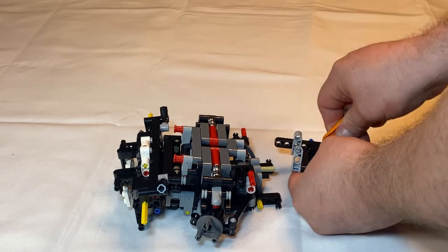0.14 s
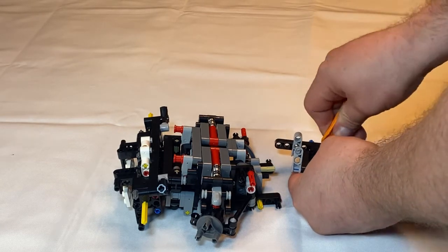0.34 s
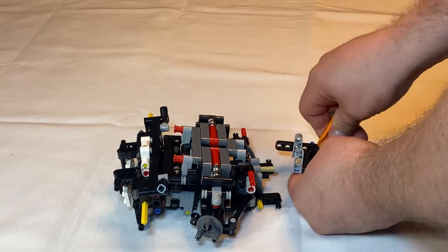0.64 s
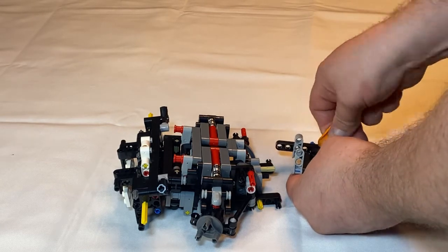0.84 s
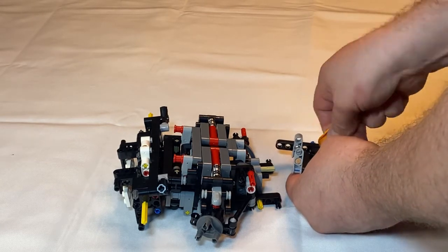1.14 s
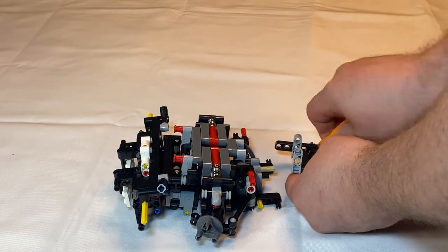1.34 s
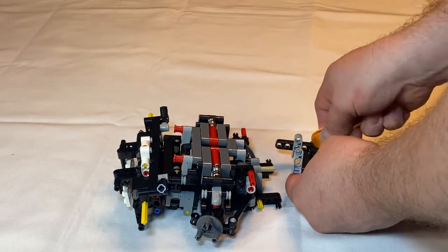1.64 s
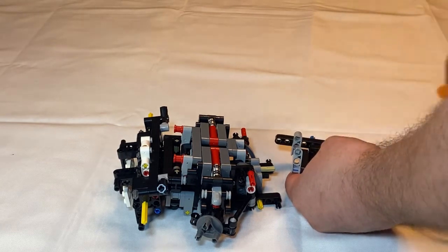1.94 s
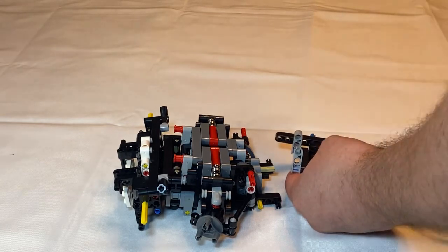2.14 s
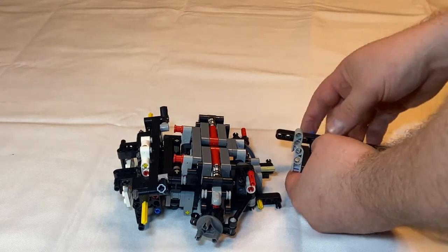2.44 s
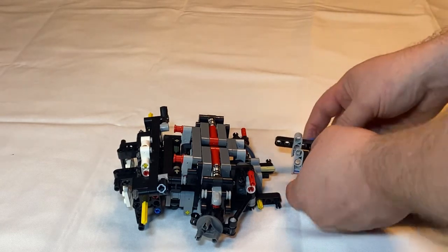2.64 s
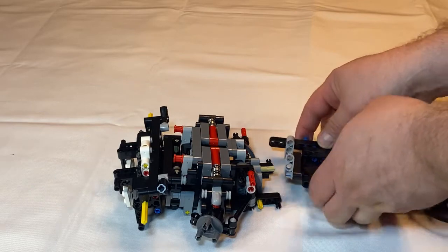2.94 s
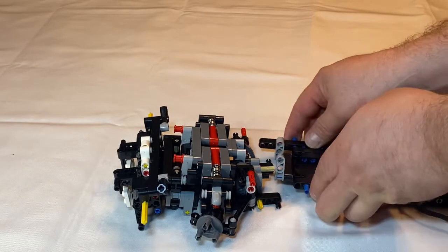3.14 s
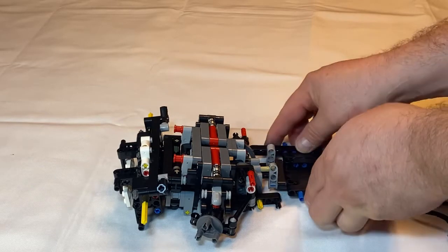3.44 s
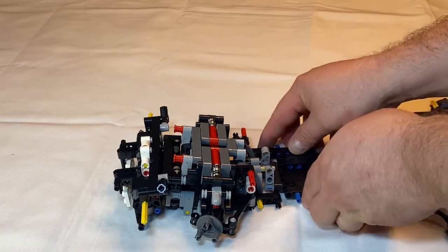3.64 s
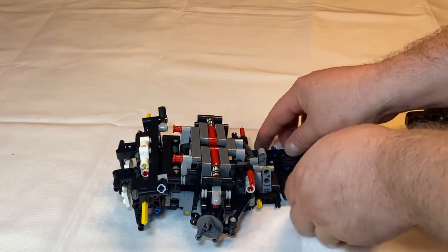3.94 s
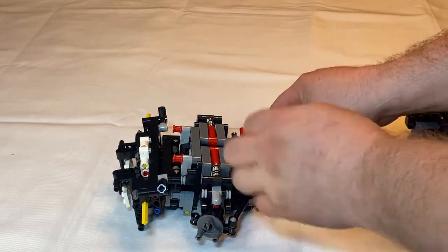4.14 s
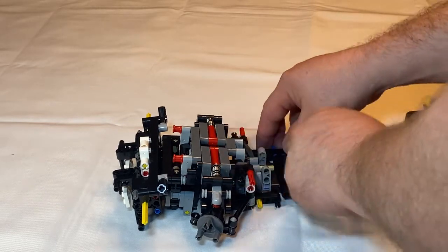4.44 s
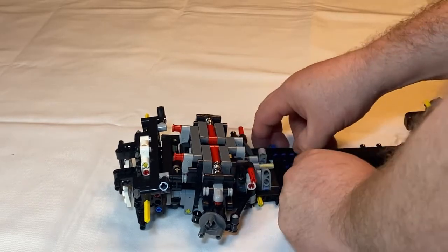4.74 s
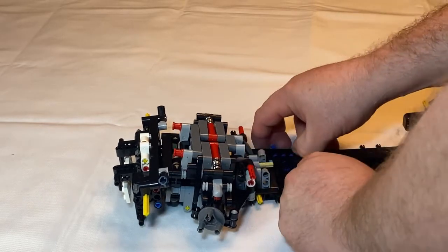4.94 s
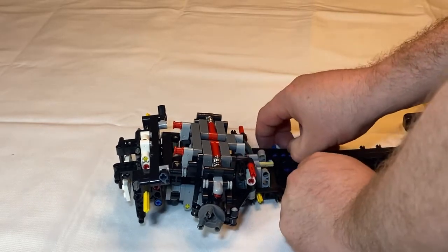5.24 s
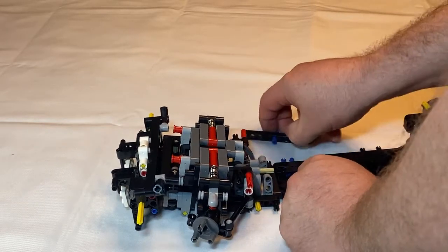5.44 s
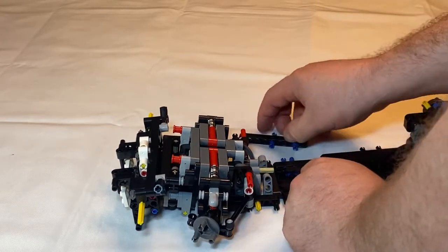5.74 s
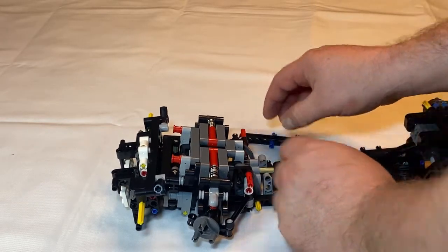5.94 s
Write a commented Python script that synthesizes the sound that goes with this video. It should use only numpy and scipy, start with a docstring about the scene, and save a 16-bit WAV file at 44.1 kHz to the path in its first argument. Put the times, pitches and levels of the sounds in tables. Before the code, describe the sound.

Plastic building bricks click and creak lightly as they are handled, with one dull knock and a loud double snap near the end.

```python
"""Assembling a plastic brick model

Hands work on a cloth-covered table in a small room. Pins click and creak in their holes by
stick-slip friction, a loose part is put down with a dull knock, and a sub-assembly slides over the
cloth. At last it snaps home: a loud double crack excites the normal modes of frame and table."""
import sys
import numpy as np
from scipy import signal
from scipy.fft import rfft, irfft
from scipy.io import wavfile

SR = 44100
rng = np.random.default_rng(int(sys.argv[2]) if len(sys.argv) > 2 else 0)


def transcribe(signal):
    """Save signal, clipped to [-1, 1], as a 16-bit WAV file at the path in sys.argv[1]."""
    frames = np.atleast_2d(signal).T
    limited = np.clip(frames, -1, 1)
    pcm = np.round(limited * 32767).astype(np.int16)
    wavfile.write(sys.argv[1], SR, pcm)


N = 268569
TAPS = 4096  # samples in a short impulse response
HZ, AGE = np.fft.rfftfreq(TAPS, 1 / SR), np.arange(TAPS) / SR  # its axes: f/Hz, t/s

# the two pins that snap home: t/s, level/dB, pin pitch f/Hz, boost at that pitch/dB
SNAPS = [(5.3471, 10, 6540, 5.5), (5.3698, 12, 2940, 9.5)]
# spectrum of the struck frame: f/Hz, level/dB
FRAME_SPECTRUM = [(60, -10.5), (180, 4), (300, 1), (480, -6), (900, -2.5), (1400, -1.5), (2100, -5),
                  (2900, -3), (4200, 2), (5300, -1), (6700, 1.5), (7800, -9), (13300, -8), (15500, -20)]
def snaps():
    """Impulsive excitation: two pins jump into their seats, each with a short burst of chatter."""
    out = np.zeros(N)
    for s, db, pin_hz, pin_db in SNAPS:
        tone_db = read(FRAME_SPECTRUM, HZ) + pin_db * bell(pin_hz, octaves=0.16)
        add(out, s, amp(db) * strike(tone_db, chatter_s=0.0018, rise_s=0.00045, evenness=0.45))
    return out


# normal modes of the whole frame: f/Hz, level/dB, T60/s
FRAME_MODES = [(867, -4, .15), (1153, -6, .15), (1330, -4, .15), (1797, -3, .16), (2623, -2, .16),
               (2660, -1, .16), (2789, 1, .16), (2840, -2, .16), (2922, -2, .16), (3567, 2, .17),
               (3980, 0, .16), (4379, 1, .18), (4999, -2, .16), (5320, -2, .16), (6635, -1, .14)]
def frame_ring(ring_db=-11):
    """Free vibration: the frame rings on after the jolt of each snap."""
    out = np.zeros(N)
    for s, db, _, _ in SNAPS:
        add(out, s, amp(db + ring_db) * ring(FRAME_MODES, detune=0))
    return out


# single clicks of pins and beams: t/s, level/dB, body/dB, treble/dB, beam pitch f/Hz
# (body and treble are relative to the middle band)
CLICKS = [(0.0144, -25.5, -10.5, -8, 2630), (0.0465, -26, -6, 1, 2600), (0.0688, -22, -10.5, -5.5, 3430),
          (0.2663, -26.5, -3, -6.5, 2970), (0.479, -34, -3, 23, 3250), (0.493, -32.5, -44, -12, 3200),
          (0.6056, -21, -15, -3, 2050), (0.8431, -30, 9, -0.5, 2560), (0.8868, -24.5, -16.5, -2, 2550),
          (1.0328, -20, -15.5, -17, 1720), (1.0473, -42, -4, 9, 2240), (1.1576, -26.5, -12, -4, 2760),
          (1.1703, -32.5, 11, 5, 2780), (2.6273, -30, -12, -4, 2690), (2.69, -29, -28, 3.5, 2740),
          (2.8676, -24.5, -5, -12, 2600), (2.9086, -23.5, -14, -13, 2730), (2.9191, -27.5, -30, -2, 2800),
          (2.9412, -24, -41, -5.5, 2650), (3.1227, -32, -34, -10, 2700), (3.7732, -28.5, -11, -3.5, 2900),
          (3.8515, -25.5, -28, -37, 2640), (3.8636, -28.5, -5.5, 5, 2960), (3.9345, -38, -16, -37, 2950),
          (4.0956, -27.5, 0.5, -11, 2520), (4.281, -36.5, -11, -10, 3100), (4.5477, -28, -8.5, -9, 2650),
          (4.817, -14.5, -11, -5, 2790), (4.9646, -25.5, 4, -0.5, 2800), (4.991, -25, -1, -6.5, 2760),
          (5.022, -26, 5.5, -7.5, 2800), (5.1383, -24.5, 3.5, -8, 2540), (5.1906, -23, 3.5, -5, 2850),
          (5.215, -29, -3.5, -7, 2830), (5.2372, -22.5, 1, -6.5, 2900), (5.2663, -21, 0.5, -1, 3240),
          (5.7976, -34, -26, -50, 2740), (5.8574, -35.5, -21, -5.5, 2996)]
# creaks of tight pins: start t/s, duration/s, number of slips, first level/dB,
# change by the last slip/dB, body/dB, treble/dB, beam pitch f/Hz
CREAKS = [(0.1953, .027, 4, -27, 0, -2.5, -5, 3520), (0.5152, 0.056, 4, -29.5, -12.5, -46, -9, 3410),
          (0.607, 0.0083, 2, -25, -1.5, 3.5, 2, 2020), (1.053, .0594, 5, -27.5, -2, -13.5, -3.5, 2590),
          (1.1245, .013, 3, -23.5, -18, -13, -1.5, 2870), (1.4604, .0385, 4, -29.5, 1.5, -20.5, -6, 2630),
          (1.6032, 0.012, 3, -38.5, 8, -1.5, 0.5, 2960), (4.5875, 0.0032, 2, -21, -8, -15, -34, 2590),
          (4.6327, 0.0081, 2, -23, 0, -5.5, -3.5, 3380)]
def slips(spread_db=3.5, jitter_s=.0004):
    """Stick-slip motion: a creak is a nearly periodic run of slips. Lists these and the single clicks."""
    contacts = list(CLICKS)
    for start, length, count, db, change_db, *colour in CREAKS:
        for along in np.linspace(0, 1, round(count)):
            late, strong = rng.standard_normal(2)
            s = start + along * length + jitter_s * late
            contacts.append((s, db + along * change_db + spread_db * strong, *colour))
    return contacts


# spectrum of a small struck part: f/Hz, level/dB
PART_SPECTRUM = [(100, -7), (400, -14.5), (1000, -18), (1800, -16.5), (2300, -3), (2800, -2), (3400, -3),
                 (4300, -10.5), (5300, -12), (6600, -9.5), (8000, -18), (10500, -24.5), (13000, -19),
                 (15500, -36.5)]
# quickly damped modes of the beams: f/Hz, level/dB, T60/s
BEAM_MODES = [(2706, -1, 0.097), (2756, 14, .04), (3210, -9.5, 0.033), (4380, -8.5, 0.016), (6000, -6, .02),
              (6900, -4, 0.02)]
def clicks(contacts, level_db=1, ring_db=-11, usual_body_db=-16, usual_treble_db=-5, sliding_db=-62):
    """Impact and resonance: each slip of a pin gives a broadband click and rings a beam."""
    out = np.zeros(N)
    low = read([(1600, 0.97), (2300, 0.12)], HZ)
    high = read([(3700, 0.083), (5200, 0.91)], HZ)
    motion, _ = friction_envelopes(contacts)
    for s, db, body_db, treble_db, beam_hz in contacts:
        colour_db = low * (body_db - usual_body_db) + high * (treble_db - usual_treble_db)
        tone_db = read(PART_SPECTRUM, HZ) + colour_db + 3 * bell(beam_hz, octaves=0.078)
        sliding = min(motion[round(s * SR)] / amp(sliding_db), 1)  # a moving contact chatters longer
        click = strike(tone_db, chatter_s=.0012 + 0.0015 * sliding, rise_s=0.00033, evenness=.2)
        beam = np.array(BEAM_MODES) * [beam_hz / BEAM_MODES[0][0], 1, 1]
        add(out, s, amp(db + level_db) * click)
        add(out, s, amp(db + ring_db) * ring(beam, detune=0.037))
    return out


# a soft brush on the table, then dull knocks of a part being put down:
# t/s, level/dB, cut-off f/Hz, chatter decay/s, rise/s
KNOCKS = [(2.11, -24, 400, 0.064, 0.049), (2.213, -18, 450, 0.012, 0.0041),
          (2.2288, -6, 2870, 0.0066, 0.001), (2.239, -8, 870, 0.011, 0.0013),
          (2.277, -17, 2520, 0.0045, 0.0029), (2.302, -16, 1510, 0.013, 0.005),
          (2.342, -26, 2030, 0.0096, 0.0055)]
# their spectrum before that cut-off: f/Hz, level/dB
KNOCK_SPECTRUM = [(60, -9.5), (170, -2), (300, 0.5), (520, -3), (700, -1), (950, -3.5), (1200, -10),
                  (1500, -7.5), (2100, -11), (2800, -10.5), (3200, -19), (3600, -31), (6000, -35),
                  (9000, -46)]
def knocks():
    """A soft contact is a low-pass filter: cloth muffles a brush, then a part that lands and settles."""
    out = np.zeros(N)
    for s, db, cutoff_hz, chatter_s, rise_s in KNOCKS:
        tone_db = read(KNOCK_SPECTRUM, HZ) - 10 * np.log10(1 + (HZ / cutoff_hz) ** 2)
        add(out, s, amp(db) * strike(tone_db, chatter_s, rise_s))
    return out


# pushes of the model against the table: t/s, level/dB, favoured f/Hz
PUSHES = [(.21, -45, 106), (0.612, -33, 132), (0.847, -44.5, 101.6), (1.106, -46.5, 148), (1.176, -51, 151),
          (1.614, -44.5, 299), (1.643, -49.5, 80), (2.878, -40, 185), (2.945, -39.5, 70), (3.87, -46.5, 76),
          (4.641, -44.5, 251.6), (4.68, -48, 90), (4.823, -43.5, 263.2), (4.839, -38.5, 90.7),
          (5.201, -45.5, 245.5), (5.349, -20, 283.3), (5.371, -27.5, 90.2)]
# normal modes of the table: f/Hz, level/dB, T60/s
TABLE_MODES = [(46, -4, .3), (75, -3.5, 0.47), (98.5, 3.5, 0.15), (139, -2.5, 0.14), (162.2, -1, 0.23),
               (193, -5, 0.21), (217.3, 0.5, 0.029), (296.4, 1.5, 0.14), (345, -4, 0.28), (398, -1.5, 0.11)]
def table_bumps(contacts, rise_s=0.0037, detune=0.027, octaves=0.77, jolt_db=-27, jolt_hz=200):
    """Modal excitation: pushes and slips ring the table; the softer the contact, the lower the modes."""
    out, t = np.zeros(N), np.arange(SR // 3) / SR
    hz, db, t60 = np.transpose(TABLE_MODES)[:, :, None]
    decay = amp(-60 * t / t60)
    jolts = [(s, slip_db + jolt_db + .5 * body_db, jolt_hz) for s, slip_db, body_db, _, _ in contacts]
    for s, push_db, contact_hz in PUSHES + jolts:
        weights = unit(amp(db) * np.exp(-.5 * (np.log2(hz / contact_hz) / octaves) ** 2))
        cycles = hz * t * (1 + detune * rng.standard_normal(hz.shape)) + rng.random(hz.shape)
        modes = (weights * decay * np.sin(2 * np.pi * cycles)).sum(0)
        add(out, s, amp(push_db) * modes * (1 - np.exp(-t / rise_s)))
    return out


# light strokes of plastic on plastic and cloth: middle t/s, duration/s, level/dB, brightness/dB
STROKES = [(0.438, 0.016, -77, 15.5), (1.474, 0.045, -56, -3), (1.745, 0.024, -63.5, -4),
           (1.93, 0.029, -95, 27.5), (2.68, 0.14, -63.5, 1), (2.898, 0.19, -51.5, -6.5),
           (3.139, 0.2, -62.5, -1.5), (3.424, 0.038, -61, 3.5), (3.543, 0.15, -69.5, -13),
           (3.716, 0.13, -64, -27), (3.81, 0.14, -62, -14)]
def friction_envelopes(contacts, edge_db=-10, scrape_db=-42.5, scrape_fade_s=.02):
    """Friction noise follows motion: low and high band gains for strokes and a scrape after each slip."""
    t = np.arange(N) / SR
    gain, treble = np.zeros((2, N))
    for s, length, db, bright_db in STROKES:
        swell = amp(db + edge_db * np.minimum((2 * (t - s) / length) ** 2, 20))
        gain += swell
        treble += swell * amp(bright_db)
    for s, db, _, treble_db, _ in contacts:
        scrape = amp(db + scrape_db) * np.exp(-AGE / scrape_fade_s)
        add(gain, s, scrape)
        add(treble, s, scrape * amp(.5 * treble_db))
    return gain, treble


# spectrum of light rubbing: f/Hz, level/dB
RUB_SPECTRUM = [(400, -27), (1000, -17.5), (1800, -5.5), (2400, -5.5), (2900, 0.5), (3800, -10), (5600, -4),
                (7100, -7), (8300, -14.5), (10100, -17), (12000, -7), (14000, -19), (15500, -28.5)]
def rubbing(contacts, level_db=-3, rattle_db=-3, split_hz=4200):
    """Sliding friction: dense tiny slips make a gritty hiss, and sparser catches rattle the beams."""
    gain, treble = friction_envelopes(contacts)
    grit = tinted(grains(per_s=530, spread_db=2.0, hiss=0.59), RUB_SPECTRUM)
    rattle = np.zeros(N)
    for _ in range(2):
        catches = grains(per_s=95, spread_db=7.5, hiss=0)
        rattle += signal.oaconvolve(catches, ring(BEAM_MODES, detune=0.034))[:N]
    grit += amp(rattle_db) * unit(rattle) * np.sqrt(N)
    mellow = signal.sosfiltfilt(signal.butter(2, split_hz, fs=SR, output="sos"), grit)
    return amp(level_db) * (mellow * gain + (grit - mellow) * treble)


# envelope of the sub-assembly's slide: t/s, level/dB
DRAG_ENVELOPE = [(2.62, -84), (2.72, -58.5), (2.79, -82), (2.85, -58), (2.9, -51.5), (2.95, -66),
                 (3.02, -70)]
# spectrum of that slide: f/Hz, level/dB
DRAG_SPECTRUM = [(100, 3), (280, 1.5), (600, 0), (1300, 3.5), (2300, 1), (4000, -3), (8000, -21)]
def drag(level_db=-2, fade_s=0.0058):
    """Friction under load: the weight of the sub-assembly drags over the cloth with a dull noise."""
    s, db = np.transpose(DRAG_ENVELOPE)
    t = np.arange(N) / SR
    fade = np.clip(np.minimum(t - s[0], s[-1] - t) / fade_s, 0, 1)
    noise = tinted(grains(per_s=530, spread_db=3.5, hiss=0.92), DRAG_SPECTRUM)
    return amp(level_db + np.interp(t, s, db)) * fade * noise


# diffuse tail of the room: f/Hz, T60/s, level/dB
REVERB = [(80, 0.68, 3), (262, 0.31, 3), (708, 0.37, -1.5), (2970, 0.34, -3.5), (6440, 0.34, -8),
          (13100, 0.22, -7)]
# reflections from near walls and the table top: delay t/s, level/dB
ECHOES = [(.0016, -24.5), (.0039, -19), (.0069, -17), (.0095, -10), (0.014, -9), (.0162, -25.5),
          (0.035, -21), (.060, -18)]
def room(x, wet_db, echo_db, build_s=0.00067):
    """Reverberation: direct sound, early reflections and a diffuse tail whose treble dies first."""
    t = np.arange(SR) / SR
    hz, age, bands = signal.stft(rng.standard_normal(SR), SR, nperseg=256)
    t60, db = (read(np.array(REVERB)[:, [0, k]], hz)[:, None] for k in (1, 2))
    equal_energy = np.sqrt(2 * np.log(1000) / (t60 * SR))  # band energy independent of T60
    bands = bands * amp(db - 60 * age / t60) * equal_energy
    tail = signal.istft(bands, SR, nperseg=256)[1][:SR]
    response = amp(wet_db) * tail * (1 - np.exp(-t / build_s))
    response[0] += 1  # direct sound
    for delay, db in ECHOES:
        add(response, delay, amp([db + echo_db]))
    return signal.fftconvolve(x, response)[:N]


# spectrum of the room's air noise: f/Hz, level/dB
AIR_SPECTRUM = [(15, -33), (27, -19), (42, -2.5), (75, -2.5), (120, -11), (240, -15.5), (400, -18),
                (800, -25), (1500, -31.5), (2700, -30), (4500, -36), (7000, -38), (9000, -50.5),
                (12500, -39.5), (15000, -58.5)]
def air(level_db=-64):
    """Stationary noise: a faint background, strongest in the bass."""
    return amp(level_db) * tinted(rng.standard_normal(N), AIR_SPECTRUM)


def strike(tone_db, chatter_s, rise_s, evenness=0):
    """Source and filter: a random burst that swells and dies is coloured by tone_db; energy 1."""
    force = unit(rng.choice([-1, 1], TAPS) * np.exp(-AGE / chatter_s) * (1 - np.exp(-AGE / rise_s)))
    # the random burst colours each click unevenly; evenness smooths that colour
    lumps_db = 10 * np.log10(abs(rfft(force)) ** 2 + .1)
    return unit(signal.fftconvolve(force, causal(tone_db - evenness * lumps_db))[:TAPS])


def ring(modes, detune):
    """Superposition of damped modes, with energy 1; detune shifts them a little for each spot hit."""
    hz, db, t60 = np.transpose(modes)[:, :, None]
    t = np.arange(0, t60.max(), 1 / SR)
    hz = hz * (1 + detune * rng.standard_normal(hz.shape))
    return unit((amp(db - 60 * t / t60) * np.sin(2 * np.pi * hz * t)).sum(0))


def grains(per_s, spread_db, hiss):
    """Shot noise: tiny slips of uneven size at random times, over a smooth hiss."""
    sizes = amp(spread_db * np.minimum(rng.exponential(1, N), 4)) * rng.choice([-1, 1], N)
    return unit(sizes * (rng.random(N) < per_s / SR)) + hiss * unit(rng.standard_normal(N))


def causal(db):
    """Minimum phase: the most compact causal impulse response with the gain db over HZ."""
    log_gain = np.log(amp(np.maximum(db, -100)))
    mirrored = np.concatenate([log_gain, log_gain[-2:0:-1]])
    return np.fft.ifft(np.exp(np.conj(signal.hilbert(mirrored)))).real


def tinted(x, spectrum):
    """Spectral shaping of a long sound, at rms 1."""
    gain = amp(read(spectrum, np.fft.rfftfreq(N, 1 / SR)))
    return unit(irfft(rfft(x) * gain, N)) * np.sqrt(N)


def bell(hz, octaves):
    """Gaussian peak of height 1 in log frequency."""
    return np.exp(-.5 * (np.log2((HZ + 1) / hz) / octaves) ** 2)


def read(points, hz):
    """Linear interpolation of a spectrum in log frequency."""
    f, value = np.transpose(points)
    return np.interp(np.log(hz + 1), np.log(f + 1), value)


def amp(db):
    """Decibels to amplitude ratio."""
    return 10 ** (np.asarray(db) / 20)


def unit(x):
    """Normalisation to energy 1."""
    return x / np.sqrt(np.sum(x ** 2) + 1e-20)


def add(mix, s, sound):
    """Superposition of a sound on the mix at time s."""
    part = mix[max(round(s * SR), 0):][:len(sound)]
    part += sound[:len(part)]


# channel gains, left then right: level/dB
BALANCE_DB = [
    [-3.5],
    [2.5],
]
def scene():
    """Linear superposition of all sources in the room; the right channel is stronger."""
    contacts = slips()
    handling = room(clicks(contacts) + rubbing(contacts) + drag(), wet_db=-1.0, echo_db=-9.5)
    crack = room(snaps(), wet_db=1, echo_db=-7.5) + frame_ring()
    dull = room(knocks(), wet_db=-2.0, echo_db=-11)
    table = room(table_bumps(contacts), wet_db=-4, echo_db=-6.5)
    return (handling + crack + dull + table + air()) * amp(BALANCE_DB)


def record(dry, notch_hz=9000, notch_db=-14, edge_hz=15800):
    """Microphone response: a notch in the treble, clipping on overload, then a band limit."""
    notch = causal(notch_db * bell(notch_hz, octaves=0.061))
    heard = signal.oaconvolve(dry, notch[None])[:, :N]
    low_pass = signal.firwin(511, edge_hz, window=("kaiser", 9), fs=SR)
    return signal.oaconvolve(np.clip(heard, -1, 1), low_pass[None], "same")


dry = scene()
out = record(dry)
transcribe(out)
```